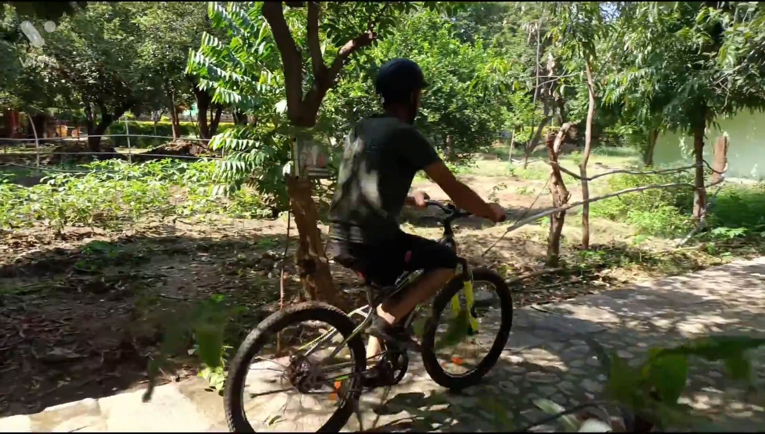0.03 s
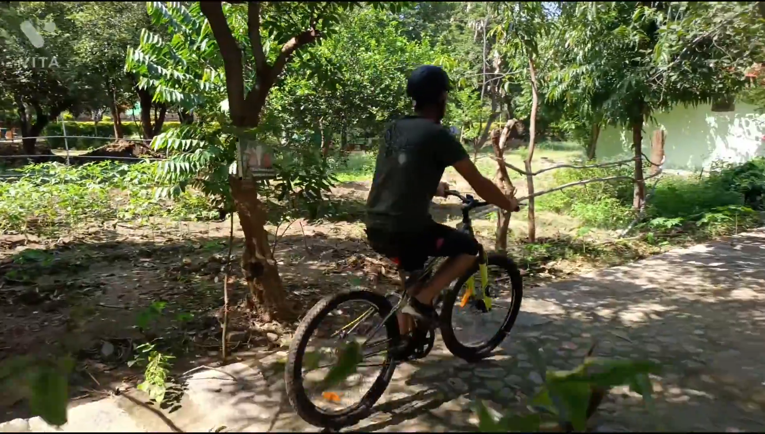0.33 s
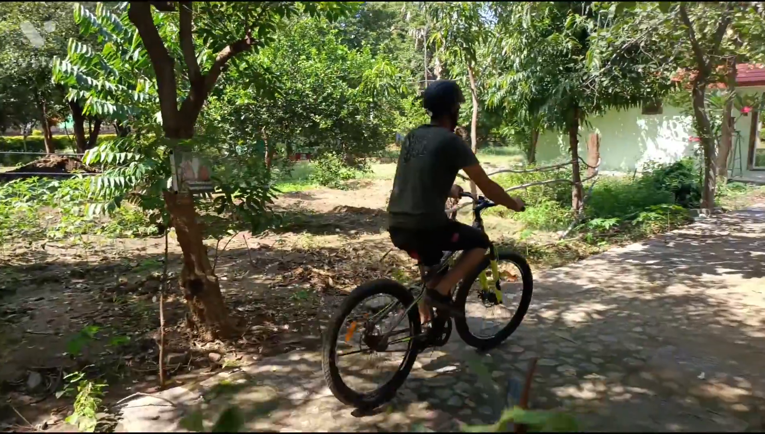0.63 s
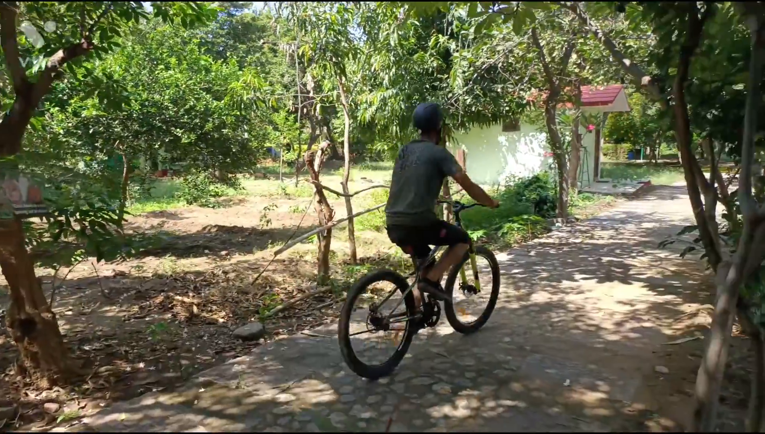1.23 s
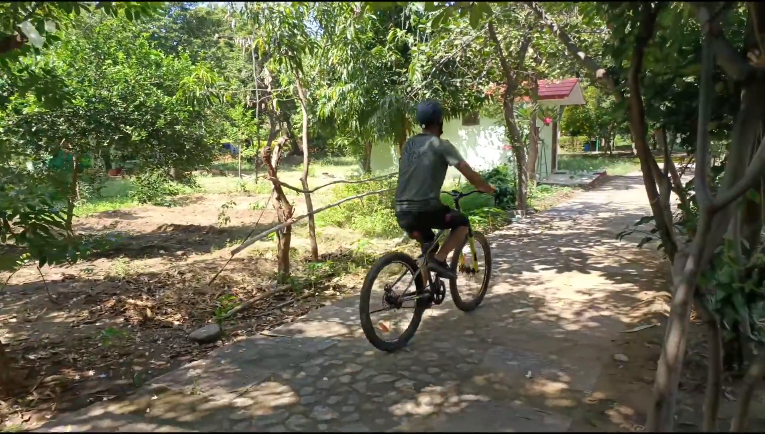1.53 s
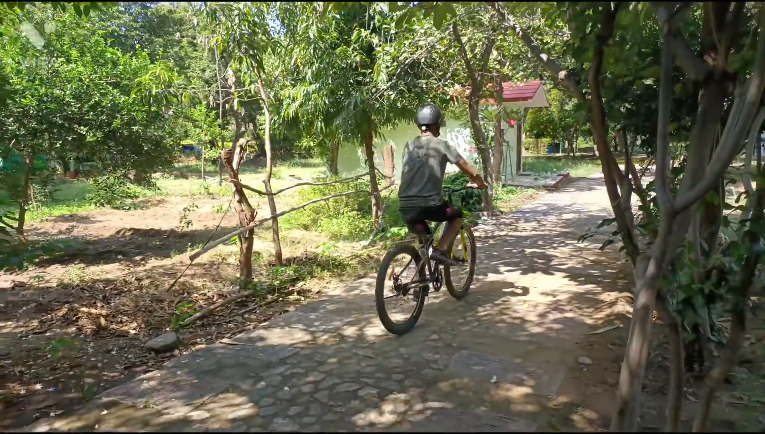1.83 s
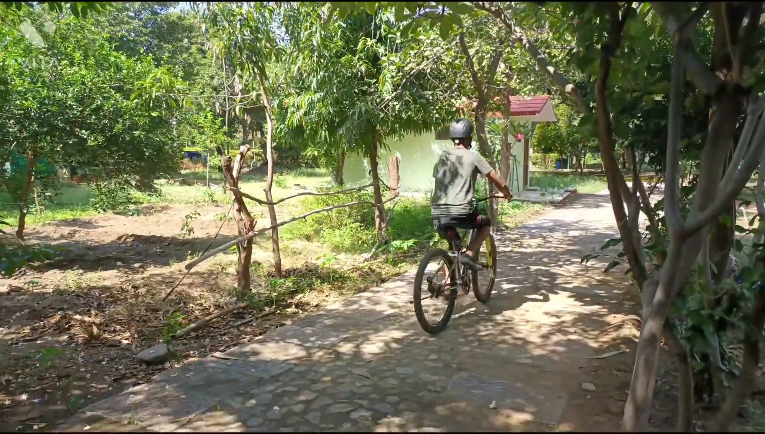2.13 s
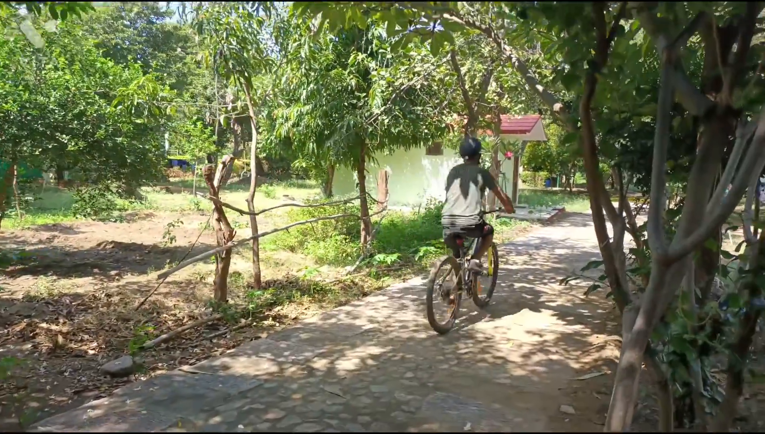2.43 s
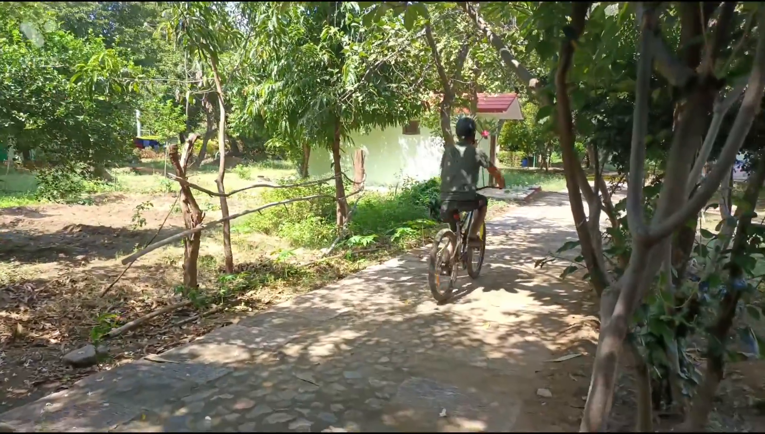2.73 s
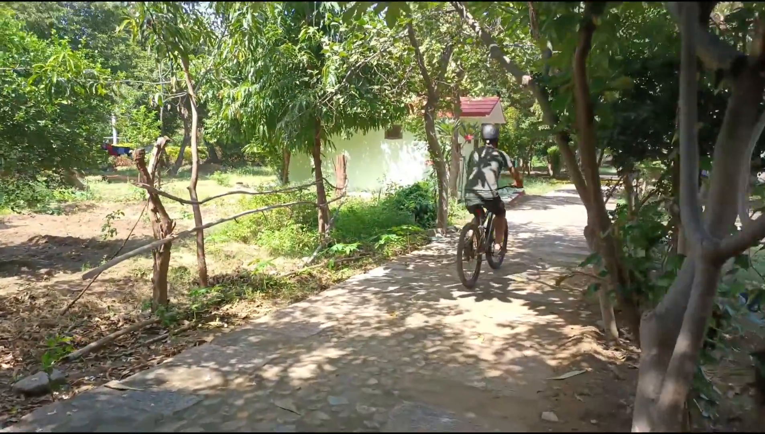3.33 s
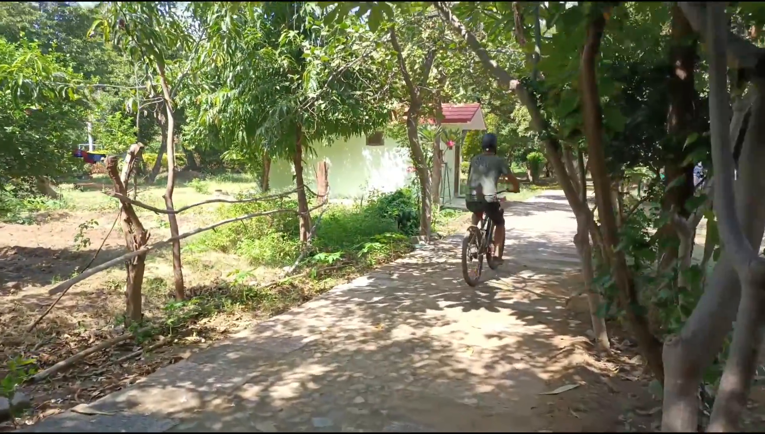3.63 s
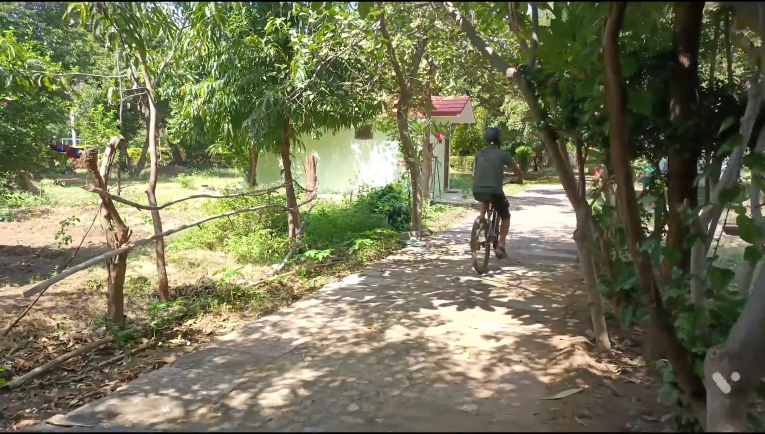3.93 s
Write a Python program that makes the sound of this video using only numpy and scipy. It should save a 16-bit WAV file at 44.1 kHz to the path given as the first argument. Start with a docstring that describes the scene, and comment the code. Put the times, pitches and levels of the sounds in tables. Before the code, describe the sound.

A bicycle bell rings sharply once, then twice more, loud and close. In the gap a bird gives three falling whistles on the left, the bicycle rattles briefly and dry leaves crunch, over a faint outdoor hiss and rumble.

```python
"""A paved path among trees, heard through a stereo microphone. A bicycle's bell is struck three times,
its dome ringing loud enough to overload the recorder. Off to the left a bird gives three falling
whistles that scatter in the trees. The bicycle rattles, feet scuff over dry leaves, and two soft bumps
sound at the microphone. Under it all lie a thin far chirping, a leafy hiss and a low rumble."""
import sys
import numpy as np
from scipy import signal
from scipy.fft import rfft, irfft, next_fast_len
from scipy.io import wavfile
from scipy.ndimage import map_coordinates

SR = 44100
rng = np.random.default_rng(int(sys.argv[2]) if len(sys.argv) > 2 else 0)


def wrap_up_sound(samples):
    """Save the sound to the file named by the first command line argument, as 16-bit audio."""
    columns = np.atleast_2d(samples).T
    # keep every value between -1 and 1, then stretch to whole-number steps
    tamed = np.clip(columns, -1, 1)
    steps = np.round(tamed * 32767).astype(np.int16)
    wavfile.write(sys.argv[1], SR, steps)


N = 176400


def amp(db):
    return 10 ** (np.asarray(db) / 20)


def unit(x):
    return x / np.sqrt(np.mean(x ** 2) + 1e-20)


def clock():
    return np.arange(N) / SR


def along(points, hz):
    """Read (f/Hz, value) points on a log frequency axis."""
    f, v = np.transpose(points)
    return np.interp(np.log(hz + 1), np.log(f + 1), v)


def pan(db):
    """Left and right gains; positive dB leans left."""
    return amp(np.array([[db], [-db]]) / 2)


def wobble(rate):
    """A smooth random curve, rate knots a second."""
    return map_coordinates(rng.standard_normal(int(N * rate / SR) + 4), [clock() * rate])


def filtered(x, response):
    size = next_fast_len(N + SR // 4)
    return irfft(rfft(x, size) * response(np.fft.rfftfreq(size, 1 / SR)), size)[..., :N]


def noise(response, side_db=-7):
    """Coloured stereo noise of rms 1."""
    mid, side = filtered(rng.standard_normal((2, N)), response)
    return unit(np.array([mid + amp(side_db) * side, mid - amp(side_db) * side]))


def shape(points):
    return lambda f: amp(along(points, f))


def hump(hz, octaves):
    """A broad or narrow resonance about hz."""
    return lambda f: 1 / (1 + (np.log2((f + 1) / hz) / octaves) ** 2)


def decay(start, t60):
    """A sudden start and an exponential fall."""
    t = clock() - start
    return (t >= 0) * amp(-60 * np.maximum(t, 0) / t60)


def swell(peak, half_length):
    """A smooth rise and fall."""
    return np.exp(-2 * ((clock() - peak) / half_length) ** 2)


def puffs(rows, octaves):
    """Soft puffs of noise, each about its own pitch."""
    return sum(amp(db) * swell(peak, half) * noise(hump(hz, octaves)) for peak, db, half, hz in rows)


# Bell strokes: t/s, level/dB, low-mode boost/dB, high-mode boost/dB, pan/dB, undamped for/s, t60 ratio
BELL_STROKES = [(-.07, -3, -1, -3.5, 1, 1.0, 0.9), (2.7427, -5.5, -2.5, 0, -1.5, .6, 1.055),
                (3.7946, -1.5, -5.5, 1, 0, .6, 1.235)]
# The dome's beating pairs: f/Hz, level/dB, base t60/s, twin's offset/Hz, twin's level/dB, pan/dB
DOME_MODES = [(1875, -45.5, 0.68, 22.5, -10, 5), (2511, -10.5, 1.317, -18.5, -5.5, 11),
              (5030, -41.5, 0.9, 14, -14, 14), (6443.6, -1.5, 0.81, 39.5, -8.5, 7),
              (9100, -34, 0.48, 28, -4, -11), (11700, -1.5, 0.3, 76.5, -8, -2.5),
              (12360, -31, 0.39, 36, -9, -6)]
def bell(attack_s=0.0018, damped_t60=1, echo_db=-3, flutter_db=2):
    """The dome's paired modes beat and ring until damped; their echoes flutter as the bicycle moves."""
    out = np.zeros((2, N))
    main_hz = DOME_MODES[3][0]
    for start, db, low_db, high_db, pan_db, held, ring_ratio in BELL_STROKES:
        span = slice(max(round(start * SR), 0), round(start * SR) + 2 * SR)
        t = np.maximum(clock()[span] - start, 0)
        drift = lambda rate: map_coordinates(rng.standard_normal(1024), [t * rate], mode="mirror")
        gate = (1 - np.exp(-t / attack_s)) * amp(-60 * np.maximum(t - held, 0) / damped_t60)
        colour = [(2500, low_db), (6400, 0), (11700, high_db)]
        for hz, mode_db, t60, split_hz, twin_db, mode_pan_db in DOME_MODES:
            flutter_rate = 43.5 * hz / main_hz  # faster in the high modes
            mid, side = [(drift(flutter_rate) + 1j * drift(flutter_rate)) / 2 for _ in range(2)]
            echo = amp(echo_db) * (mid + np.array([side, -side]))
            twin = amp(twin_db) * np.exp(2j * np.pi * split_hz * t)
            ring = np.imag((1 + twin + echo) * np.exp(2j * np.pi * hz * t))
            struck_db = db + mode_db + along(colour, hz)
            envelope = amp(struck_db - 60 * t / (t60 * ring_ratio) + flutter_db * drift(9.7))
            out[:, span] += pan(pan_db + mode_pan_db) * gate * envelope * ring
    return out


# Spectrum of the hammer's clack: f/Hz, level/dB
CLACK_SPECTRUM = [(200, -30), (700, -17), (1300, -13.5), (2100, -5), (4000, -4.5), (7000, -4), (9000, -2.5),
                  (12000, 8.5), (16000, -20)]
def hammer(clack_db=-8.5, t60=0.14, snap_lead_s=0.0047, snap_db=-19):
    """At each bell stroke the lever snaps free, then the hammer clacks on the dome."""
    blows = sum(amp(db + clack_db) * (decay(start, t60) + amp(snap_db) * decay(start - snap_lead_s, t60))
                for start, db, *_ in BELL_STROKES)
    dry = noise(shape(CLACK_SPECTRUM)) * blows
    return pan(3) * (dry + amp(-10) * trees(dry))


# Bird calls: t/s, level/dB, pitch ratio, length/s
BIRD_CALLS = [(1.407, -19.5, 1.006, 0.14), (1.886, -16, 1.01, .14), (2.274, -18, .99, .122)]
# Loudness through one whistle: share of its length, level/dB
WHISTLE_ENVELOPE = [(0, -9), (.1, -8), (.25, -4.5), (.36, 0.5), (.46, -6), (.62, -14), (.8, -19.5),
                    (1, -24)]
def bird(high_hz=4700, low_hz=1862, scoop_hz=382, rough_db=3, left_lead_s=0.0004):
    """Off to the left, a whistle scoops up, then slides down an S-curve by more than an octave."""
    out = np.zeros((2, N))
    for start, db, ratio, length in BIRD_CALLS:
        progress = np.clip((clock() - start) / length, 0, 1)
        fall = low_hz + (high_hz - low_hz) / (1 + (progress / .34) ** 3.4)
        scoop = scoop_hz * np.exp(-progress / 0.0304)
        pitch = ratio * (fall - scoop) * (1 + .005 * wobble(300))
        gate = np.clip(20 * np.minimum(progress, 1 - progress), 0, 1)
        level_db = db + np.interp(progress, *np.transpose(WHISTLE_ENVELOPE)) + rough_db * wobble(250)
        dry = gate * amp(level_db) * np.sin(2 * np.pi * np.cumsum(pitch) / SR)
        direct = np.array([dry, np.roll(dry, round(left_lead_s * SR))])  # left microphone first
        out += direct + amp(-2.5) * trees(dry)
    return pan(8) * out


# Knocks of the bicycle: t/s, level/dB
RATTLE_KNOCKS = [(1.894, -35), (2.0389, -15), (2.1003, -25.5), (2.4558, -33)]
# Resonances of its parts: f/Hz, width/Hz, level/dB
FRAME_MODES = [(2195, 270, 8.5), (2570, 32, 3), (3030, 370, -7.5), (4300, 78, -3), (5580, 91, -34),
               (6110, 99, -1)]
def rattle(t60=0.034):
    """Short blows ring the bicycle's parts, left of the microphone."""
    def frame(f):
        return sum((-1) ** k * amp(db) * 1j * f * width / (hz * hz - f * f + 1j * f * width)
                   for k, (hz, width, db) in enumerate(FRAME_MODES))
    blows = sum(amp(db) * decay(start, t60) for start, db in RATTLE_KNOCKS)
    dry = noise(frame, side_db=-48) * blows
    return pan(12) * (dry + amp(-6) * trees(dry))


# Dry clicks and crunches: t/s, level/dB, t60/s, centre f/Hz, pan/dB
GRIT_CRACKS = [(.175, -37.5, 0.032, 3780, 12), (.608, -43, .06, 5500, 11), (.985, -41, 0.2, 4080, -1.5),
               (1.044, -40, 0.18, 4300, 3), (1.126, -43, 0.098, 3000, 4), (1.666, -36, 0.057, 11000, 3),
               (2.039, -39, 0.15, 5950, 2), (2.1455, -30.5, 0.075, 10100, 0),
               (2.172, -34.5, 0.034, 10700, -1), (2.5551, -30.5, 0.032, 8300, 17),
               (2.578, -46, 0.034, 8000, 24), (2.6, -40, 0.036, 8000, 15), (2.64, -43, 0.05, 8000, 15.5),
               (3.15, -48.5, 0.12, 12000, 18.5), (3.3298, -39, 0.2, 5100, 14),
               (3.718, -39, 0.029, 5700, 15.5)]
def grit(grain_db=3):
    """Grit and dry leaves crack on the path, mostly to the left."""
    cracks = sum(pan(pan_db) * amp(db) * decay(start, t60) * noise(hump(hz, octaves=0.55))
                 for start, db, t60, hz, pan_db in GRIT_CRACKS)
    dry = cracks * amp(grain_db * wobble(500))
    return dry + amp(-9) * trees(dry)


# Course of the leaf rustle: t/s, relative level/dB
RUSTLE_ENVELOPE = [(0, -53.5), (.85, -62.5), (1.0, -50.5), (1.25, -57.5), (1.74, -55), (1.95, -47),
                   (2.15, -37.5), (2.21, -47), (2.4, -52), (2.469, -41.5), (2.63, -39.5), (2.72, -68.5),
                   (3.4, -61.5), (4, -56)]
# Spectrum of dry leaves: f/Hz, level/dB
LEAF_SPECTRUM = [(2940, -34), (5000, -5.5), (6070, 1.5), (8250, -17), (10300, -3), (13800, -2.5),
                 (16000, -14)]
# Soft scuffs: t/s, level/dB, half-length/s, centre f/Hz
FOOT_SCUFFS = [(.135, -43, 0.04, 1510), (.29, -51.5, 0.019, 3900), (.645, -45.5, 0.05, 3050),
               (1.03, -51.5, 0.19, 1180), (1.81, -53, 0.056, 2210), (2.45, -51.5, .05, 1630),
               (3.045, -51, 0.052, 1480)]
def feet(gain_db=2, grain_db=3.5):
    """Feet scuff over dry leaves, which rustle in fine grains."""
    level_db = np.interp(clock(), *np.transpose(RUSTLE_ENVELOPE)) + gain_db
    leaves = noise(shape(LEAF_SPECTRUM)) * amp(grain_db * wobble(600) + 4.8 * wobble(32))
    rustle = amp(level_db) * unit(leaves)
    scuffs = puffs(FOOT_SCUFFS, octaves=0.54) * amp(5.3 * wobble(70))
    return pan(9) * rustle + pan(2) * scuffs


# A low swell: t/s, level/dB, half-length/s, centre f/Hz
LOW_PUFF = [(1.95, -51.5, 0.41, 178)]
def low_swell():
    """A faint band of low noise rises and sinks midway."""
    return puffs(LOW_PUFF, octaves=0.43)


# Low bumps: t/s, level/dB, half-length/s, f/Hz
MICROPHONE_BUMPS = [(1.79, -29, 0.021, 89.6), (3.124, -26.5, 0.02, 46)]
def bumps():
    """Soft thuds right at the microphone, a few cycles each."""
    return sum(amp(db) * swell(peak, half) * np.sin(2 * np.pi * hz * (clock() - peak))
               for peak, db, half, hz in MICROPHONE_BUMPS)


def far_chirps(hz=4565, level_db=-66.5, pulse_hz=9, depth_db=7):
    """Far off, a thin band of noise pulses, fading in and out."""
    pulse = np.cos(2 * np.pi * (pulse_hz * clock() + 0.16 * wobble(3.1)))
    return amp(level_db + depth_db * pulse + 9 * wobble(2.04)) * noise(hump(hz, octaves=0.012))


# Echo decay among the trees: f/Hz, t60/s
TREE_DECAY = [(500, 0.25), (2500, 0.36), (4500, 0.52), (7000, 0.412), (12000, .28)]
def trees(x, uneven_db=5):
    """Uneven echoes return from trunks and foliage, lingering longest near 4.5 kHz."""
    size = SR * 3 // 4
    echoes = rng.standard_normal((2, size)) * amp(uneven_db * wobble(900)[:size])
    hz, t, bands = signal.stft(echoes, SR, nperseg=256)
    fade = amp(-60 * t / along(TREE_DECAY, hz)[:, None])
    tail = signal.istft(bands * fade, SR, nperseg=256)[1]
    return signal.fftconvolve(np.atleast_2d(x), tail / np.linalg.norm(tail[0]), axes=1)[:, :N]


# Spectrum of the low rumble: f/Hz, level/dB
RUMBLE_SPECTRUM = [(12, -33.5), (20, 0.5), (38, 0.5), (92, -1), (147, -8.5), (197, -15.5), (269, -18),
                   (329, -27), (357, -26), (500, -30.5), (650, -34), (1100, -120)]
# Spectrum of the leafy hiss: f/Hz, level/dB
HISS_SPECTRUM = [(180, -55), (300, -11), (584, -12.5), (762, -10.5), (2170, -10), (2570, -2), (2790, -10.5),
                 (4520, -9.5), (6410, -22.5), (10600, -11.5), (16000, -32.5)]
def grove(rumble_db=-43.5, hiss_db=-50.5):
    """Rumble and leafy hiss waver gently all around the microphone."""
    rumble = amp(rumble_db + 1.35 * wobble(6.07)) * noise(shape(RUMBLE_SPECTRUM), side_db=-8)
    hiss = amp(hiss_db + wobble(11)) * noise(shape(HISS_SPECTRUM), side_db=-2.5)
    return pan(-3) * rumble + pan(2.5) * hiss


def scene():
    foreground = bell() + hammer() + bird() + rattle() + grit() + feet()
    return foreground + low_swell() + bumps() + far_chirps() + grove()


def record(dry, ceiling_db=0.5, hardness=6.8, top_hz=16000):
    """The loudest strokes overload the recorder, which keeps nothing above its band limit."""
    clipped = dry / (1 + np.abs(dry / amp(ceiling_db)) ** hardness) ** (1 / hardness)
    return filtered(clipped, lambda hz: hz < top_hz)


dry = scene()
out = record(dry)
wrap_up_sound(out)
```